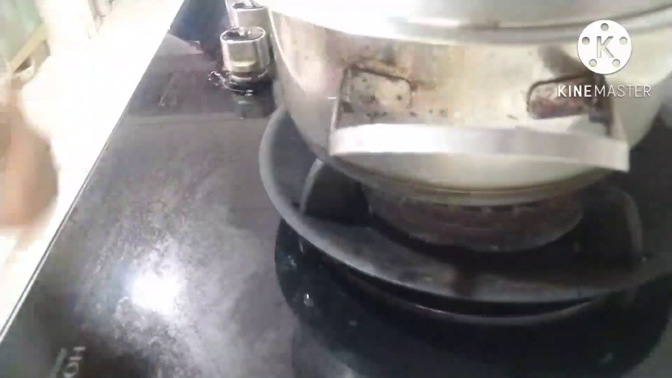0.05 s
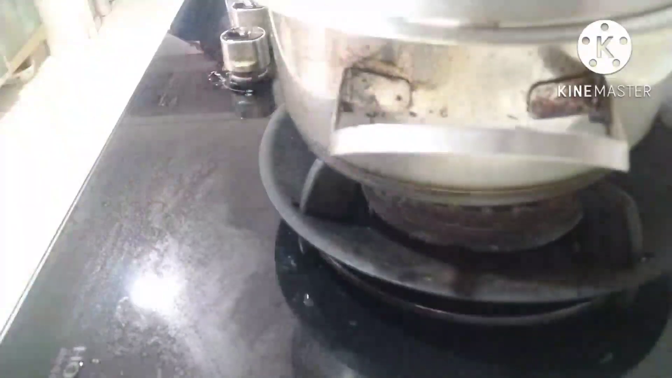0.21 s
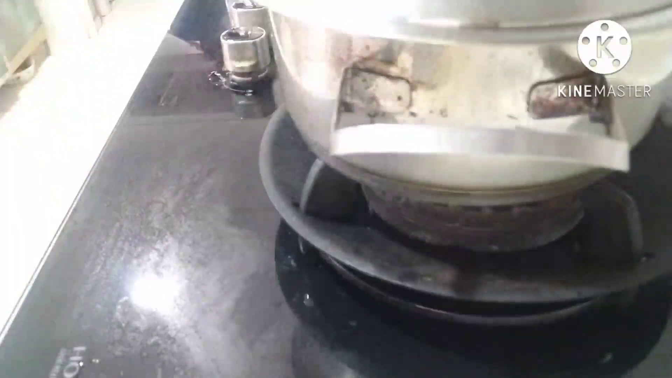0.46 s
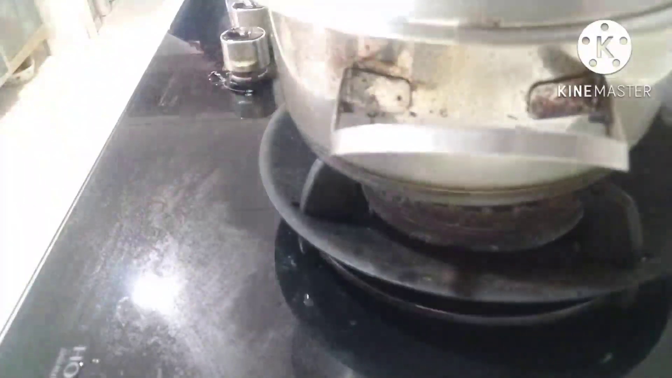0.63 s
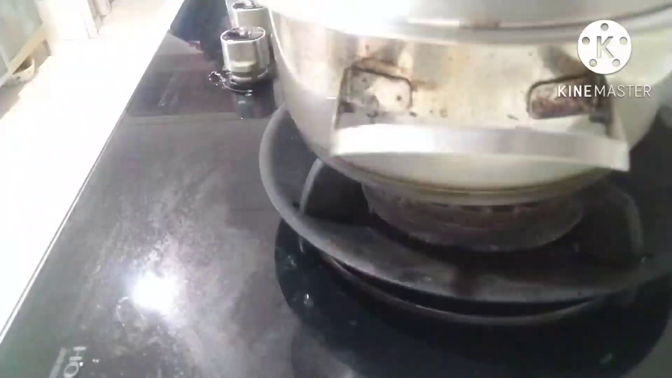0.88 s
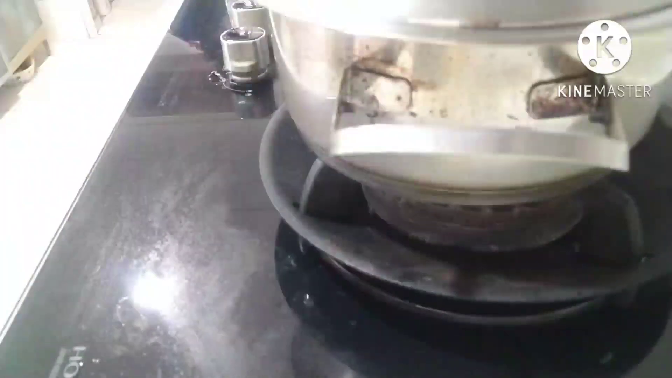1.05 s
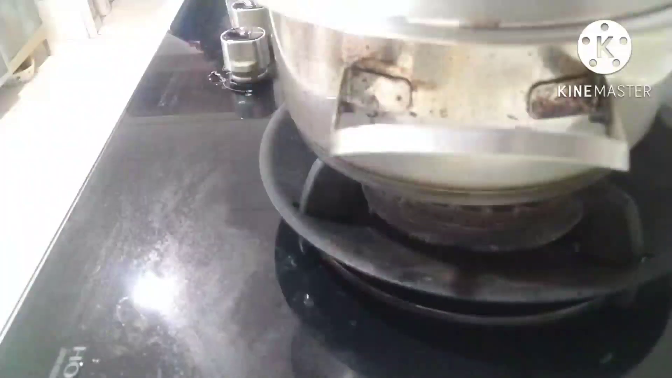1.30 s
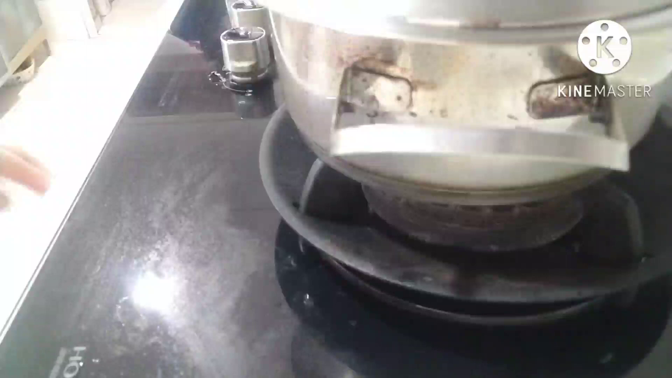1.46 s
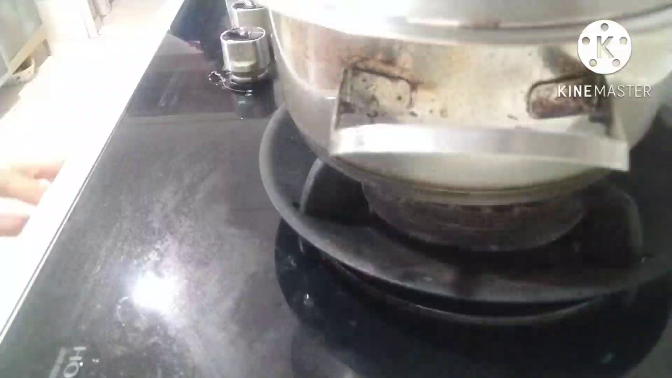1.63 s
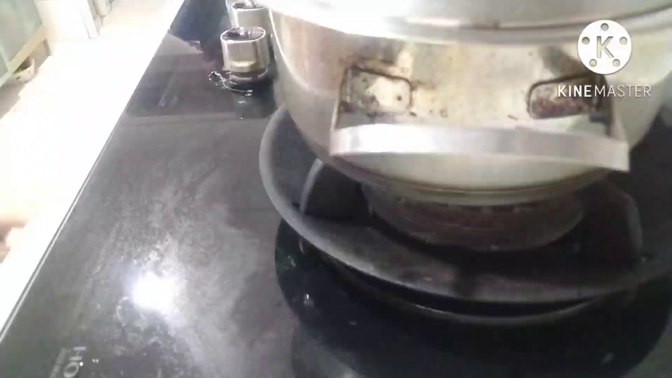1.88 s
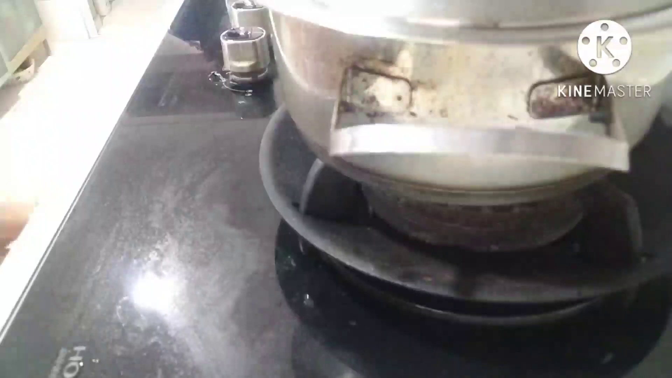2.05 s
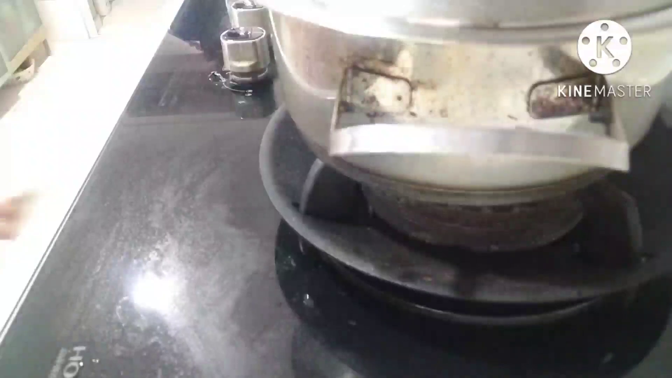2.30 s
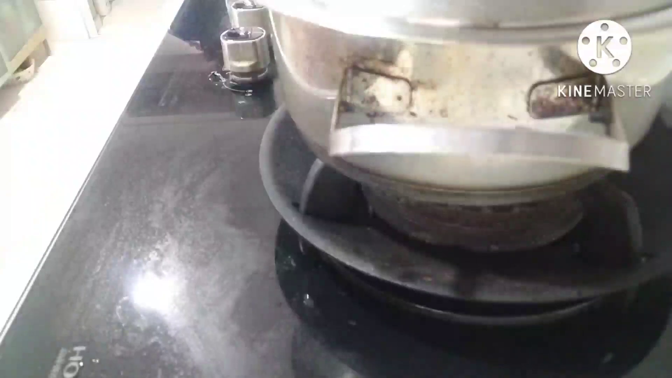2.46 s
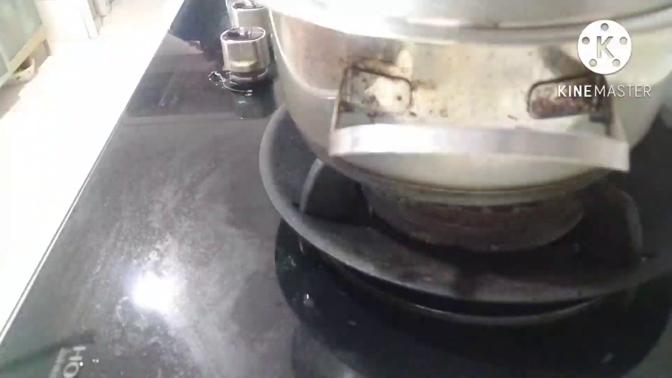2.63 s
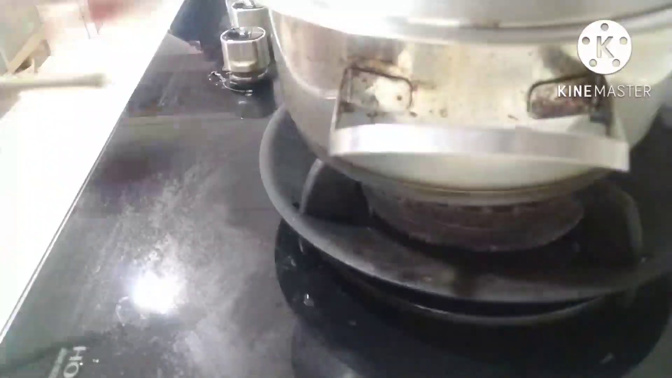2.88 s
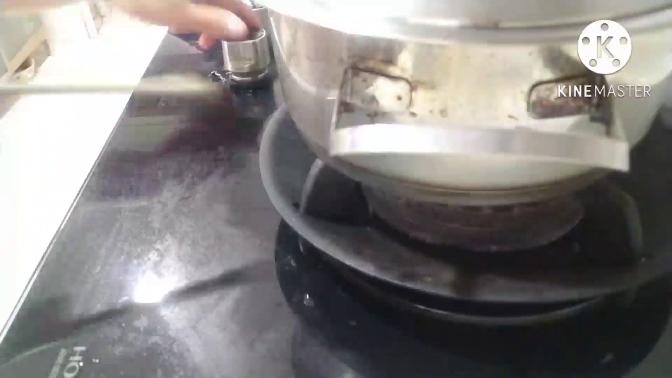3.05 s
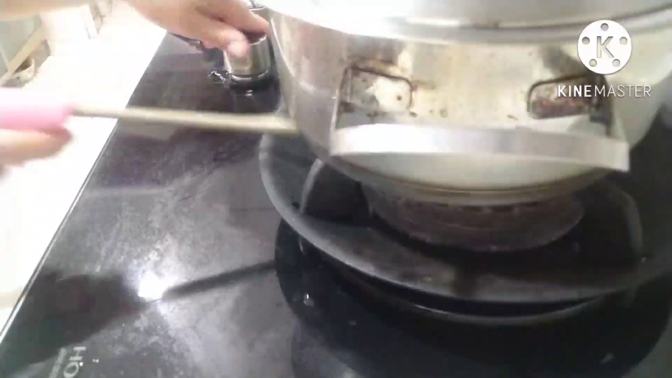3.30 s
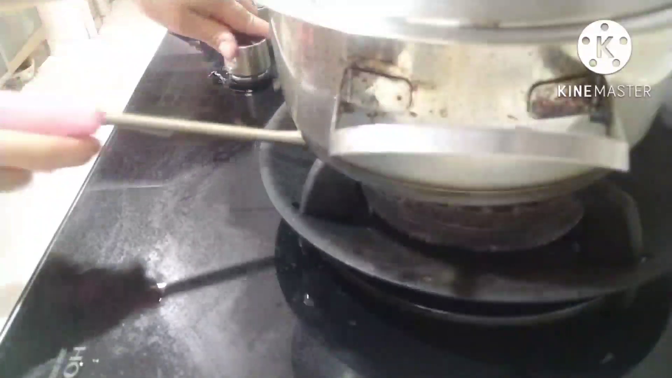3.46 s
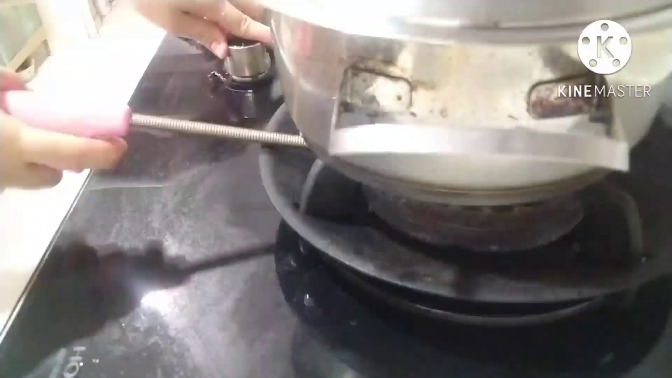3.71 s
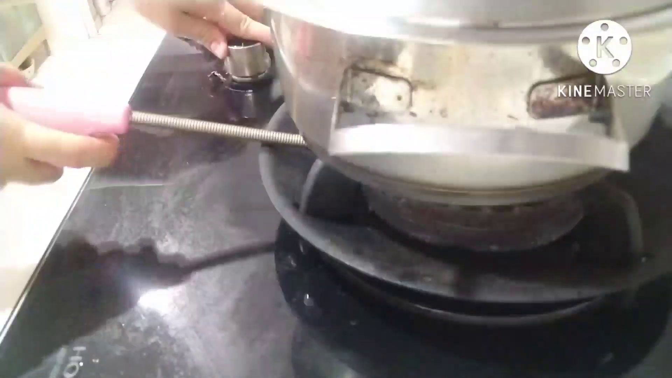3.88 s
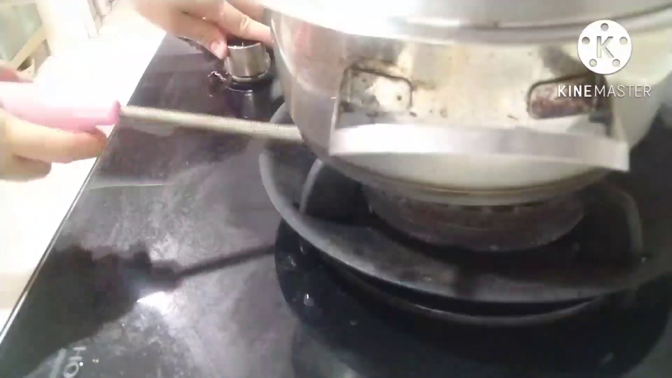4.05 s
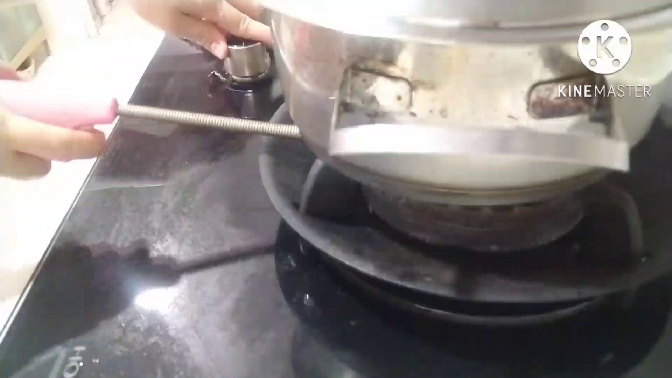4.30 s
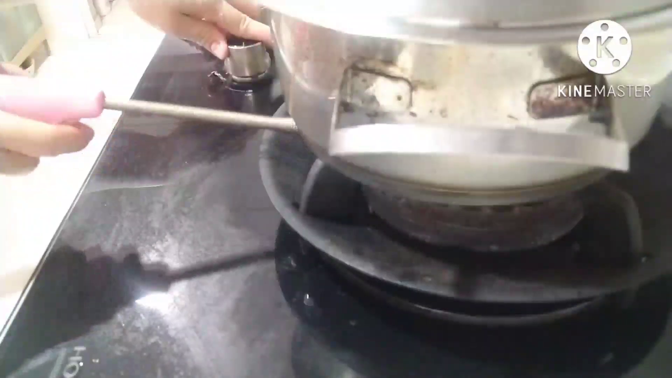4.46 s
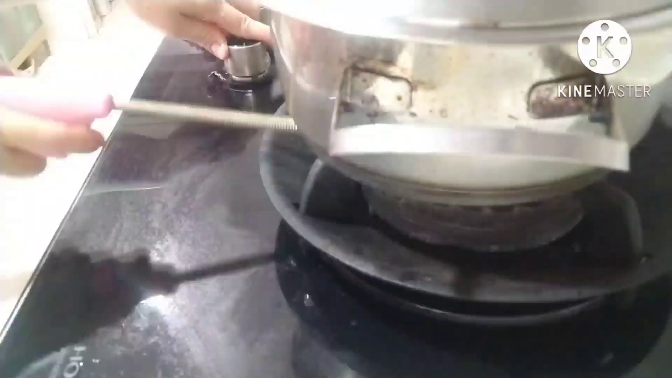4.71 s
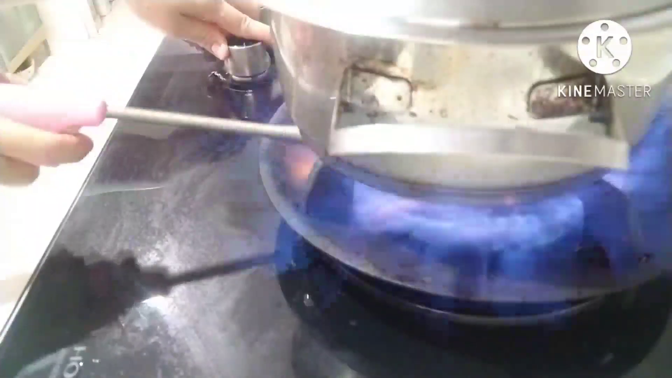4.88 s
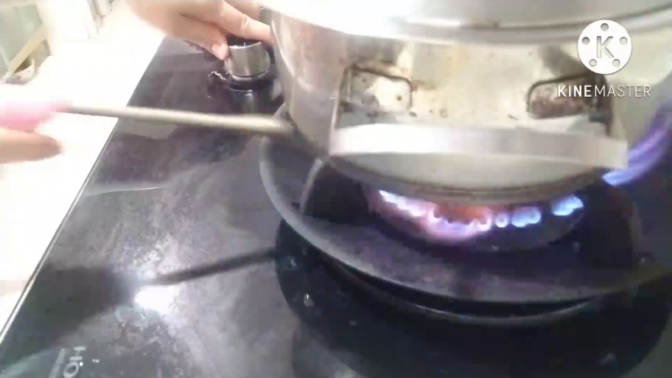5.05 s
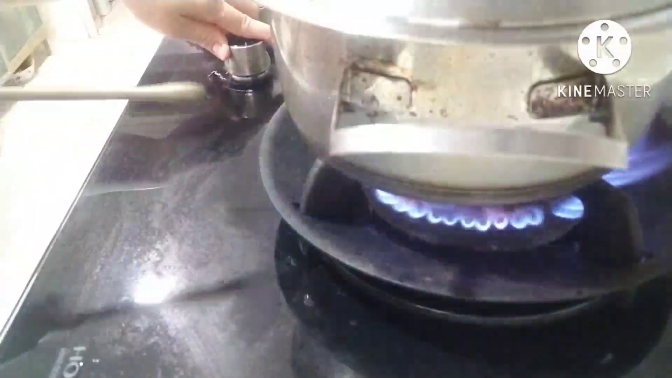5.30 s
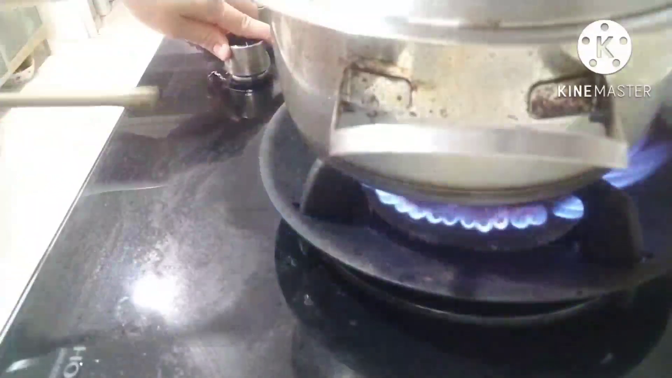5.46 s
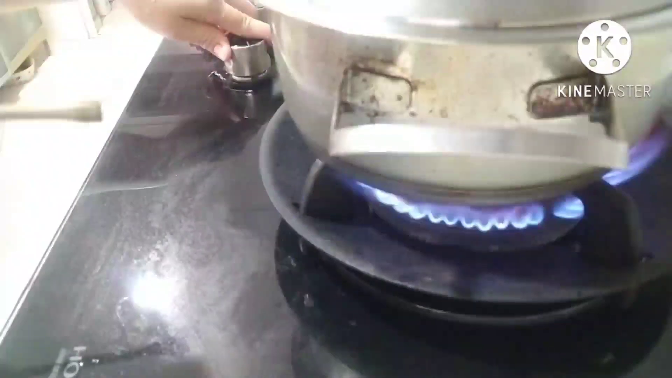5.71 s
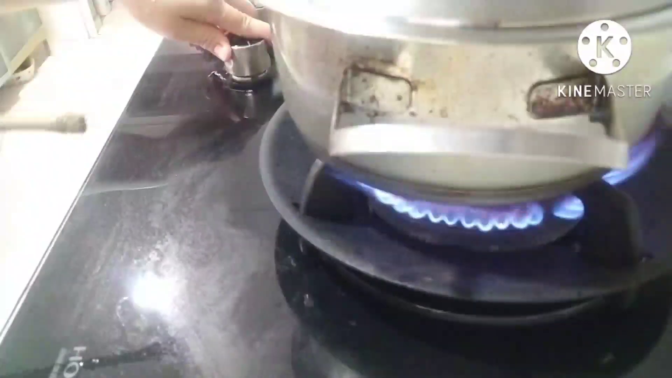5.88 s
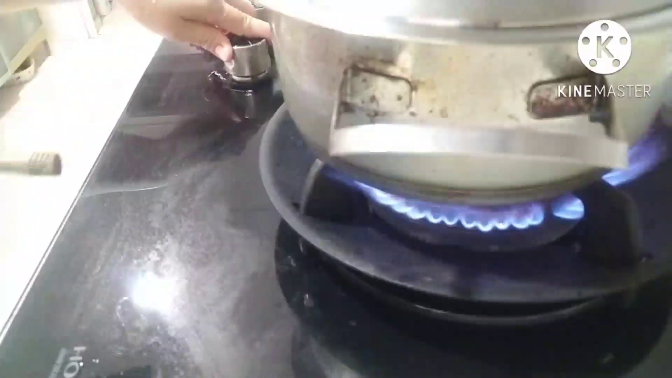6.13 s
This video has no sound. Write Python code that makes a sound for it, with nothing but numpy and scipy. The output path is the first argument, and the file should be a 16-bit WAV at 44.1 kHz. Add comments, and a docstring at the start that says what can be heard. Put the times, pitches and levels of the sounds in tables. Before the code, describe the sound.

A small, hard-walled kitchen heard close to the hob, with a very faint steady hush. Soft shuffling and nudges on the worktop begin at once. At 0.9-1.0 s a catch rattles and clunks firmly. Light plastic knocks and metal tinks follow at 1.5 s, a dull padded bump like a cupboard door at 1.9 s, more knocks around 2.0-2.1 s and 2.6 s. From 3.1 to 3.8 s a hand touches, presses and turns the knob, with small clacks and a brief grinding; faint gas starts rushing near 3.75 s. Sharp, bright piezo snaps crack at 3.9, 4.4 and 4.8 s, lightly ringing the steel pot, with thinner trigger clicks between. The second brings a small low puff; the third ignites a soft, lumpy whump that fades within half a second. A last thin click comes at 5.1 s, then a quiet, hollow, fluttering hiss swells slightly until 5.8 s and eases to the end.

```python
"""Lighting a gas hob

In a small, hard-walled kitchen, things clack and bump while a long-neck lighter is fetched: shaped pushes
ring resonances and echoes. The knob opens the gas, which is coloured noise, and three piezo snaps ring the
case, a steel pot and the room. The second spark puffs; the third takes with a soft noise whump, which gives
way to a quiet, hollow hiss of fluttering noise resonances."""
import sys
import numpy as np
from scipy import signal
from scipy.fft import rfft, irfft, next_fast_len
from scipy.io import wavfile
from scipy.ndimage import map_coordinates

SR = 44100
rng = np.random.default_rng(int(sys.argv[2]) if len(sys.argv) > 2 else 0)


def to_wav(s):
    """Save 16-bit WAV."""
    ch = np.atleast_2d(s).T  # columns
    pcm = np.round(np.clip(ch, -1, 1) * 32767)  # PCM
    wavfile.write(sys.argv[1], SR, pcm.astype(np.int16))


N = 270774
SIZE = 32768  # samples in one hit
HZ = np.fft.rfftfreq(SIZE, 1 / SR)
AGE = np.arange(SIZE) / SR  # seconds since a hit began
TIME = np.arange(N) / SR  # seconds since the scene began


def amp(db):
    """Decibels to gain."""
    return 10 ** (np.asarray(db) / 20)


def unit(x):
    """Scale to rms 1."""
    return x / np.sqrt(np.mean(x ** 2) + 1e-20)


def unit_hit(x):
    """Scale a hit to rms 1 over its first 30 ms and let its far end fade to silence."""
    fade = np.clip(2 - 2 * AGE / AGE[-1], 0, 1) ** 2
    onset = x[:int(0.03 * SR)]
    return fade * x / np.sqrt(np.mean(onset ** 2) + 1e-20)


def along(points, hz):
    """Read a curve of (Hz, value) points on a log frequency axis."""
    point_hz, value = np.transpose(points)
    return np.interp(np.log(hz + 1), np.log(point_hz + 1), value)


def wobble(rate):
    """A smooth random curve with this many knots a second."""
    return map_coordinates(rng.standard_normal(2048), [TIME * rate], mode="wrap")


def resonances(modes, hz):
    """Causal response of (Hz, width, dB) resonances, with alternating signs."""
    total = 0
    for k, (centre, width, db) in enumerate(modes):
        damping = 1j * hz * width
        total = total + (-1) ** k * amp(db) * damping / (centre * centre - hz * hz + damping)
    return total


def peaks(modes, hz, skirt):
    """Gain of (Hz, width, dB) resonances; a higher skirt darkens the valleys between them."""
    return sum(amp(db) / (1 + ((hz - centre) / width) ** 2) ** skirt for centre, width, db in modes)


def causal(gain):
    """The minimum-phase response with this gain, which rings only after the blow."""
    cepstrum = irfft(np.log(np.maximum(gain, 1e-6)))
    cepstrum[1:SIZE // 2] *= 2
    cepstrum[SIZE // 2 + 1:] = 0
    return np.exp(rfft(cepstrum))


def filtered(x, response):
    """Filter x by a response given as a function of frequency."""
    size = next_fast_len(N + SIZE)
    return irfft(rfft(x, size) * response(np.fft.rfftfreq(size, 1 / SR)), size)[:N]


def noise(points):
    """Noise of rms 1 with a (Hz, dB) colour."""
    return unit(filtered(rng.standard_normal(N), lambda hz: amp(along(points, hz))))


def fluttering(modes, skirt, flutter_db, rate):
    """Noise in (Hz, width, dB) resonances, each swelling and fading on its own."""
    total = 0
    for centre, width, db in modes:
        band = filtered(rng.standard_normal(N), lambda hz: peaks([(centre, width, 0)], hz, skirt))
        total = total + amp(db) * unit(band) * unit(amp(flutter_db * wobble(rate)))
    return total


def drifting(x, depth, rate):
    """Let the pitch of a steady sound wander by a relative depth."""
    return map_coordinates(x, [np.cumsum(1 + depth * wobble(rate))], mode="wrap")


def stroke(s, length, attack, t60):
    """Gain that rises from time s, holds until s + length and then dies away."""
    age = TIME - s
    return np.clip(age / attack, 0, 1) * amp(-60 * np.maximum(age - length, 0) / t60)


def strokes(rows, attack, t60):
    """Gain of (s, length, dB) movements that share one attack and release."""
    return sum(amp(db) * stroke(s, length, attack, t60) for s, length, db in rows)


def contact(t60, chatter_db):
    """Spectrum of one sharp push followed by brief, decaying chatter."""
    chatter = rng.standard_normal(SIZE) * amp(-60 * AGE / t60)
    return 1 + amp(chatter_db) * rfft(chatter / np.linalg.norm(chatter))


def walls(size_db, count=6):
    """Early echoes off the hob, pot and tiles comb the spectrum, differently for each blow."""
    delay, size = rng.uniform(0.001, 0.014, count), rng.standard_normal(count)
    echoes = np.bincount((delay * SR).astype(int), size / np.linalg.norm(size), SIZE)
    return 1 + amp(size_db) * rfft(echoes)


# The kitchen's echo. Each row: frequency in Hz, time to fall 60 dB in seconds.
KITCHEN_ECHO = [(100, .4), (350, .38), (1500, .4), (4500, .4), (8000, .36), (10500, .28), (14000, .26)]


def room():
    """Spectrum of a fresh kitchen echo of energy 1; the treble dies first."""
    hz, t, z = signal.stft(rng.standard_normal(SIZE), SR, nperseg=256)
    decay = amp(-60 * t / along(KITCHEN_ECHO, hz)[:, None])
    tail = signal.istft(z * decay, SR, nperseg=256)[1][:SIZE]
    tail = tail * (1 - np.exp(-AGE / 0.001))
    return rfft(tail / np.linalg.norm(tail))


def add(track, s, sound):
    """Mix a sound in at time s."""
    part = track[max(round(s * SR), 0):][:len(sound)]
    part += sound[:len(part)]


# Limits of the thump, knock, clack and tick ranges. Each entry: frequency in Hz.
BLOW_BAND_EDGES = [150, 520, 1450, 4000, 10000]


def clacks(blows, modes, skirt, chatter_db, room_db):
    """A hard thing is knocked; each blow rings its modes, balanced over four ranges from thump to tick."""
    out = np.zeros(N)
    body = causal(peaks(modes, HZ, skirt) / (1 + (HZ / 9200) ** 14))
    bands = []
    for edges in zip(BLOW_BAND_EDGES, BLOW_BAND_EDGES[1:]):
        sos = signal.butter(3, edges, "band", fs=SR, output="sos")
        bands.append(signal.sosfreqz(sos, HZ, fs=SR)[1])
    for s, *band_db, t60 in blows:
        blow = body * walls(size_db=-2.5) * (contact(t60, chatter_db) + amp(room_db) * room())
        swell = 1 - np.exp(-AGE / (0.025 * t60))  # a long, scuffing contact starts softly
        hit = sum(amp(db) * unit_hit(swell * irfft(blow * band)) for db, band in zip(band_db, bands))
        add(out, s, hit)
    return out


# The hush of the still kitchen. Each row: frequency in Hz, relative level in dB.
HUSH_COLOUR = [(25, -13), (90, -7.5), (230, -14), (350, -9), (780, -11.5), (1500, -15.5), (2300, -22),
               (5000, -29.5), (9000, -34.5), (15500, -34.5)]


def hush():
    """Faint, steady coloured noise lies under everything."""
    return amp(-75.5) * noise(HUSH_COLOUR)


# Dull colour of shuffling and of the worktop's ring. Each row: frequency in Hz, relative level in dB.
SHUFFLE_COLOUR = [(20, -45), (70, -21), (170, -23.5), (290, 12), (370, 8), (480, -10.5), (900, -21),
                  (2000, -49.5), (8000, -79)]
# Colour of a slide before its brightness tilt. Each row: frequency in Hz, relative level in dB.
SWISH_COLOUR = [(1500, -31), (3000, -15.5), (5000, -5.5), (7800, 3), (9000, -17.5), (12000, -32.5)]
# A hand rubs over the worktop. Each row: start in seconds, length in seconds, level in dB.
HAND_RUBS = [(0.30, 0.029, -57), (0.975, .04, -36), (1.66, 0.071, -65), (2.62, 0.55, -65.5),
             (3.10, .27, -56), (3.63, .09, -59)]
# Something smooth slides briefly.
# Each row: start in seconds, length in seconds, level in dB, brightness in dB per octave.
SMOOTH_SWIPES = [(0.172, 0.039, -66.5, -8), (0.282, 0.11, -68, 15), (1.62, 0.047, -61, -6.5),
                 (1.731, 0.029, -60, 1), (1.932, 0.1, -64.5, 1), (3.27, 0.012, -66.5, 18),
                 (3.735, 0.032, -67.5, 11)]
# Soft nudges of the worktop. Each row: start in seconds, level in dB.
WORKTOP_NUDGES = [(0.228, -60), (0.284, -57.5), (0.400, -57), (0.58, -65.5), (0.701, -64), (0.821, -53),
                  (1.142, -56.5), (1.65, -54.5), (2.714, -59.5), (2.92, -58.5), (3.356, -52.5),
                  (5.885, -61.5)]
RUB_ATTACK_S, RUB_T60_S = 0.016, 0.31
BUSY_UNTIL_S, BUSY_DB = 3.9, -77.5  # faint shuffling goes on until the lighter is in place
SWIPE_ATTACK_S, SWIPE_T60_S = 0.022, 0.33
SWIPE_TOP_HZ = 7800  # brightness tilts the colour up to here


def hands():
    """Uneven shuffling and sliding noise, with soft nudges that sound only the low ring of the worktop."""
    busy = amp(BUSY_DB) * stroke(0, BUSY_UNTIL_S, RUB_ATTACK_S, RUB_T60_S)
    effort = strokes(HAND_RUBS, RUB_ATTACK_S, RUB_T60_S) + busy
    out = effort * noise(SHUFFLE_COLOUR) * unit(amp(4 * wobble(35)))
    for s, length, db, brightness in SMOOTH_SWIPES:
        colour = [(hz, band_db + brightness * np.log2(min(hz, SWIPE_TOP_HZ))) for hz, band_db in SWISH_COLOUR]
        swish = signal.fftconvolve(noise(colour), irfft(walls(size_db=-2)))[:N]
        unevenness = unit(amp(1.5 * wobble(45)))
        out += amp(db) * stroke(s, length, SWIPE_ATTACK_S, SWIPE_T60_S) * unit(swish) * unevenness
    worktop = causal(amp(along(SHUFFLE_COLOUR, HZ)))
    for s, db in WORKTOP_NUDGES:
        nudge = worktop * (contact(t60=0.13, chatter_db=2) + amp(-4.5) * room())
        add(out, s, amp(db) * unit_hit(irfft(nudge)))
    return out


# A catch rattles, then clunks. Each row: start in seconds, thump level in dB, knock level in dB,
# clack level in dB, tick level in dB, chatter's time to fall 60 dB in seconds.
CATCH_BLOWS = [(0.026, -83, -65, -67.5, -74, 0.27), (0.885, -54.5, -75, -63, -55.5, 0.58),
               (0.9155, -52.5, -60.5, -44, -45.5, 0.07), (0.946, -43, -52, -40.5, -46.5, 0.11),
               (0.975, -37, -36, -38, -44, 0.02), (0.986, -39, -43, -45.5, -54, 0.27)]
# The catch's ring. Each row: frequency in Hz, width in Hz, relative level in dB.
CATCH_RING = [(347, 31, 15.5), (513, 240, -0.5), (764, 99, 4.5), (960, 56, 4), (1767, 33, 7), (1874, 99, 3),
              (2140, 96, -3), (2560, 136, 4), (3580, 240, -22.5), (4180, 67, -36), (5240, 260, -31),
              (6020, 120, -32), (7270, 480, -35)]


def catch():
    """The catch's blows chatter strongly, with little of the room."""
    return clacks(CATCH_BLOWS, CATCH_RING, skirt=1.0, chatter_db=12.0, room_db=-10)


# Light touches on thin metal.
# Each row: start in seconds, pitch in Hz, level in dB, time to fall 60 dB in seconds.
METAL_TINKS = [(0.039, 1060, -59, 0.15), (1.350, 2370, -65, 0.056), (1.472, 2560, -61, 0.05),
               (1.509, 2470, -53, 0.26), (1.546, 1108, -56, 0.18), (2.126, 1115, -55, 0.098),
               (2.127, 2410, -52, 0.076), (2.553, 2350, -57.5, 0.18), (3.43, 4387, -71.5, 0.23),
               (5.112, 3440, -61.5, 0.32)]


def tinks():
    """One main note of thin metal with weak partials around it, blurred by the room."""
    out = np.zeros(N)
    partials = [(1, 3.5), (0.63, -12.5), (1.37, -12), (1.8, -18)]  # (frequency ratio, dB)
    for s, hz, db, t60 in METAL_TINKS:
        note = sum(amp(part_db) * np.sin(2 * np.pi * hz * ratio * AGE) for ratio, part_db in partials)
        note = note * amp(-60 * AGE / t60) * (1 - np.exp(-AGE / 0.0011))
        blurred = irfft(rfft(note) * (1 + amp(-8.5) * room()))
        add(out, s, amp(db) * unit_hit(blurred))
    return out


# The lighter's body knocks as it is picked up and regripped, and as its trigger reaches its end stop.
# Each row: start in seconds, thump level in dB, knock level in dB, clack level in dB, tick level in dB,
# chatter's time to fall 60 dB in seconds.
BODY_BLOWS = [(1.509, -66.5, -84, -56, -84, 0.037), (1.543, -51.5, -51, -36, -40, .015),
              (2.015, -58, -45.5, -47.5, -49, 0.023), (2.041, -39, -49, -48.5, -54, 0.1),
              (2.080, -67, -60.5, -50, -49, .015), (2.126, -60, -66, -43.5, -44.5, .012),
              (2.550, -74, -63, -50.5, -57.5, 0.016), (2.655, -82, -56.5, -46.5, -49, 0.021),
              (4.2715, -68, -52.5, -65, -68, .03), (4.7216, -66, -50.5, -59, -66.5, .03)]
# The body's ring. Each row: frequency in Hz, width in Hz, relative level in dB.
BODY_RING = [(296, 16, -3), (331, 15, 5), (720, 83, -31), (1095, 24, 10.5), (1440, 39, -6), (1744, 36, 3.5),
             (2502, 220, 16.5), (2955, 70, -7), (3163, 100, -22), (3580, 46, -12), (4000, 110, -16.5),
             (4570, 100, -16), (5400, 59, -22), (6130, 320, -14), (7220, 160, -9), (7870, 140, -15)]


def lighter_body():
    """Knocks on the lighter's body ring its resonances, with the room well in the blend."""
    return clacks(BODY_BLOWS, BODY_RING, skirt=0.8, chatter_db=9.5, room_db=1.5)


# A dull bump, like a cupboard door closing. Each row: frequency in Hz, relative level in dB.
DOOR_COLOUR = [(59, -41.5), (100, -23), (159, 0), (212, -36), (270, -11), (355, -4.5), (394, -6.5),
               (500, -1), (615, -2), (896, 2), (1120, -4), (1780, -4.5), (6000, -48.5), (7800, -76),
               (13200, -120)]
# The door panel's two close modes. Each row: frequency in Hz, starting level in dB.
PANEL_MODES = [(80, -55.5), (86, -46)]
PANEL_ATTACK_S, PANEL_FREE_S, PANEL_T60_S, PANEL_STOP_T60_S = 0.043, 0.418, 1.73, 0.068


def door():
    """A padded bump; the panel's two close modes beat until it comes to rest."""
    out, s = np.zeros(N), 1.862
    push = contact(t60=0.29, chatter_db=15.0) + amp(10.5) * room()
    blow = causal(amp(along(DOOR_COLOUR, HZ))) * walls(size_db=-2) * push
    add(out, s, amp(-34.5) * unit_hit(irfft(blow)))
    age = np.maximum(TIME - s, 0)
    panel = 0
    for hz, db in PANEL_MODES:
        wander = 1.44 * wobble(30.04)  # phase in radians
        panel = panel + amp(db) * np.sin(2 * np.pi * hz * age + wander)
    held = stroke(s, PANEL_FREE_S, PANEL_ATTACK_S, PANEL_STOP_T60_S)
    return out + panel * amp(-60 * age / PANEL_T60_S) * held


# A hand meets the knob, presses it in and turns it. Each row: start in seconds, thump level in dB,
# knock level in dB, clack level in dB, tick level in dB, chatter's time to fall 60 dB in seconds.
KNOB_BLOWS = [(3.134, -61, -60, -53.5, -51, 0.021), (3.141, -64, -44.5, -46.5, -54.5, 0.16),
              (3.247, -47.5, -56, -54, -76, 0.022), (3.282, -41, -69, -75, -90, 0.07),
              (3.429, -54, -63, -76, -62.5, 0.033), (3.693, -49, -53.5, -53, -57, 0.028),
              (3.755, -58.5, -58.5, -66.5, -72, 0.02), (3.840, -61.5, -57, -79.5, -61, 0.022)]
# The knob's ring. Each row: frequency in Hz, width in Hz, relative level in dB.
KNOB_RING = [(311.7, 18, 10.5), (522.6, 46, -11), (780, 79, 0), (900, 43, -20.5), (1150, 50, -8.5),
             (1278, 76, -3.5), (2235, 77, -5.5), (2760, 69, -17.5), (3477, 64, -27), (4180, 97, -30),
             (5653, 350, -23.5), (7350, 81, -17.5), (7830, 88, -28)]


def knob():
    """Touches on the knob ring its resonances, with plenty of chatter and room."""
    return clacks(KNOB_BLOWS, KNOB_RING, skirt=0.84, chatter_db=13.5, room_db=8.5)


# The valve's ring. Each row: frequency in Hz, width in Hz, relative level in dB.
GRIND_RING = [(680, 32, -4), (843, 71, -4), (1120, 33, -3.5), (1104, 28, 2), (1770, 46, -18.5),
              (2190, 50, -17)]
# Twists of the knob. Each row: start in seconds, length in seconds, level in dB.
KNOB_TWISTS = [(3.408, .07, -60.5), (3.615, .10, -57.5), (3.776, 0.04, -47.5)]
TWIST_ATTACK_S, TWIST_T60_S = 0.0044, 0.36


def valve():
    """The valve grinds with each twist: uneven noise sounds its resonances."""
    grind = unit(filtered(rng.standard_normal(N), lambda hz: peaks(GRIND_RING, hz, skirt=1.3)))
    return strokes(KNOB_TWISTS, TWIST_ATTACK_S, TWIST_T60_S) * grind * unit(amp(1.2 * wobble(60)))


# Colour of the unlit jet. Each row: frequency in Hz, relative level in dB.
JET_COLOUR = [(240, -42), (400, -2.5), (554, -17), (691, -6.5), (970, -9.5), (1100, 4), (1470, -29),
              (2230, -27.5), (4230, -46.5), (7700, -23.5), (9000, -38), (11700, -74.5), (19800, -120)]
# The burner's hollow. Each row: frequency in Hz, width in Hz, relative level in dB.
HOLLOW_MODES = [(1320, 85, 7), (1450, 60, -1.5), (1587, 50, -3), (1810, 69, -8)]
# The faintly whistling ports. Each row: frequency in Hz, width in Hz, relative level in dB.
PORT_MODES = [(284, 16, -3.5), (701, 110, -6.5), (2940, 49, -19.5), (3400, 36, -30.5), (4230, 60, -28.5),
              (5110, 70, -28.5), (5550, 45, -20.5), (7200, 48.8, -29), (8100, 79, -17)]
GAS_ON_S, GAS_RISE_S, GAS_DB = 3.75, 0.25, -62  # unlit gas builds up and flows until the last spark
# the lit burner draws harder after a moment, then settles
FLAME_LOW_DB, FLAME_FULL_DB, FLAME_SWELL_S = -70.5, -57, (5.43, 5.77)
FLAME_SETTLE_DB_PER_S = 10
HOLLOW_DRIFT, HOLLOW_FLUTTER_DB = 0.02, 4.5  # relative pitch wander; flutter of each resonance
PORTS_DB = -76  # gain on the blend of port modes


def burner():
    """Raw gas rushes out until it catches, then burns with a hollow, fluttering hiss."""
    lit_s = SPARK_SNAPS[-1][0]
    jet = drifting(noise(JET_COLOUR), depth=0.07, rate=11) * unit(amp(3.4 * wobble(30)))
    gas = amp(GAS_DB) * stroke(GAS_ON_S, lit_s - GAS_ON_S, GAS_RISE_S, t60=0.1) * jet
    alight = np.clip((TIME - lit_s) / WHUMP_PEAK_S, 0, 1)
    # the jet sounds the burner's hollow, whose resonances slide together with the flow
    hollow = unit(fluttering(HOLLOW_MODES, skirt=1.7, flutter_db=HOLLOW_FLUTTER_DB, rate=13))
    hollow = drifting(hollow, HOLLOW_DRIFT, rate=9)
    draw_db = np.interp(TIME, FLAME_SWELL_S, [FLAME_LOW_DB, FLAME_FULL_DB])
    draw_db = draw_db - FLAME_SETTLE_DB_PER_S * np.maximum(TIME - FLAME_SWELL_S[-1], 0)
    # each port flutters on its own and whistles faintly
    ports = fluttering(PORT_MODES, skirt=3.9, flutter_db=4.5, rate=11)
    return gas + alight * (amp(draw_db) * hollow + amp(PORTS_DB) * ports)


# The piezo hammer strikes. Each row: start in seconds, base level of the layers in dB.
SPARK_SNAPS = [(3.9379, -27), (4.3945, -28.5), (4.843, -30)]
# The trigger springs back with a thin click; fainter clicks follow.
# Each row: start in seconds, level of the click in dB.
TRIGGER_RETURNS = [(4.1877, -36.5), (4.2715, -49.5), (4.3216, -56), (4.6295, -39.5), (4.6682, -56),
                   (4.7216, -52.5), (4.7714, -61.5), (5.1103, -37.5)]
# The lighter's plastic case. Each row: frequency in Hz, width in Hz, relative level in dB.
CASE_MODES = [(1550, 150, 3.5), (3700, 150, 4), (4770, 330, 1), (7000, 1300, -3), (8740, 300, -15),
              (10700, 400, -16.5)]
# The snap as it spreads into the room. Each row: frequency in Hz, relative level in dB.
SPREAD_COLOUR = [(25, -43), (85, -24.5), (156, -10), (233, -18.5), (480, -4.5), (650, -7), (1100, -7.5),
                 (1620, 2), (2420, -6), (3200, -0.5), (4500, -4.5), (7400, -5), (9200, -17), (12300, -31),
                 (15300, -26)]
# The trigger's thin click. Each row: frequency in Hz, relative level in dB.
CLICK_COLOUR = [(150, -54.5), (250, -17.5), (795, -29), (1200, -2.5), (1890, -6.5), (2160, -6.5),
                (2530, -12), (3010, -0.5), (3960, -10), (4960, -5), (7770, -9.5), (10600, -32.5),
                (15500, -43)]
# The steel pot, set ringing by each snap. Each row: frequency in Hz, width in Hz, relative level in dB.
POT_MODES = [(1030, 20, 5.5), (1457, 9.8, -3), (1550, 4, 7), (1815, 18, 10), (2020, 5.3, -4), (3130, 32, 0),
             (3460, 36, 1), (3637, 36, -5.5), (4360, 8.2, -1), (6210, 35, -7), (6930, 37, -4.5),
             (6650, 73, 2)]


def lighter():
    """Each hammer blow cracks and rings the pot and the room; thinner clicks follow the trigger back."""
    out = np.zeros(N)
    case = resonances(CASE_MODES, HZ) * causal(1 / (1 + (HZ / 10500) ** 5))
    pot = resonances(POT_MODES, HZ)
    spread = causal(amp(along(SPREAD_COLOUR, HZ)))
    thin = causal(amp(along(CLICK_COLOUR, HZ)))
    for s, db in SPARK_SNAPS:
        crack = unit_hit(irfft(case * contact(t60=0.019, chatter_db=0)))
        echo = unit_hit(irfft(spread * room() * walls(size_db=-14.0)))
        ring = unit_hit(irfft(pot * contact(t60=0.014, chatter_db=-5.5)))
        add(out, s, amp(db) * (amp(1.0) * crack + amp(-2.5) * echo + amp(-11.0) * ring))
        add(out, s + 0.0065, amp(db - 17.0) * crack)  # the nearest wall throws the crack back
        # the hammer slips off its latch just before it lands
        slip = unit_hit(irfft(thin * contact(t60=0.03, chatter_db=12)))
        add(out, s - 0.003, amp(db - 21) * slip)
    for s, db in TRIGGER_RETURNS:
        push = contact(t60=0.023, chatter_db=5) + amp(0.5) * room()
        click = unit_hit(irfft(thin * walls(size_db=-10.0) * push))
        ring = unit_hit(irfft(pot * contact(t60=0.02, chatter_db=-3.5)))
        add(out, s, amp(db) * (click + amp(-15.0) * ring))
    return out


# Colour of the small puff. Each row: frequency in Hz, relative level in dB.
SMALL_PUFF_COLOUR = [(20, -34.5), (45, -17.5), (85, -5), (150, -3.5), (280, 6.5), (600, -23), (2000, -47.5),
                     (6000, -83.5)]
# Colour of the whump. Each row: frequency in Hz, relative level in dB.
ROAR_COLOUR = [(25, -19.5), (70, -20.5), (150, 4.5), (210, -9.5), (300, 6), (450, -4.5), (600, -3.5),
               (900, -8.5), (1300, -19.5), (2500, -22.5), (6000, -57.5)]
PUFF_DB, PUFF_ATTACK_S, PUFF_T60_S = -41.5, 0.008, 0.13  # the whump shares this attack
# the flame front grows round the ring, flares and dies away, the treble very slightly faster
WHUMP_DB, WHUMP_GROW_DB_PER_S, WHUMP_PEAK_S, WHUMP_LENGTH_S = -33.5, 230, 0.071, 0.1
WHUMP_SPLIT_HZ, WHUMP_LOW_T60_S, WHUMP_HIGH_T60_S = 380, 0.39, 0.38


def ignition():
    """The second spark gives a small puff; the third sets all the gas off in one lumpy whump."""
    (puff_s, _), (lit_s, _) = SPARK_SNAPS[-2:]
    puff_gain = amp(PUFF_DB) * stroke(puff_s, PUFF_ATTACK_S, PUFF_ATTACK_S, PUFF_T60_S)
    puff = puff_gain * noise(SMALL_PUFF_COLOUR)
    roar = noise(ROAR_COLOUR) * unit(amp(2.1 * wobble(90)))
    low = filtered(roar, lambda hz: 1 / (1 + (hz / WHUMP_SPLIT_HZ) ** 6))
    high = roar - low
    growth = amp(WHUMP_DB + WHUMP_GROW_DB_PER_S * np.minimum(TIME - lit_s - WHUMP_PEAK_S, 0))
    low_gain = stroke(lit_s, WHUMP_LENGTH_S, PUFF_ATTACK_S, WHUMP_LOW_T60_S)
    high_gain = stroke(lit_s, WHUMP_LENGTH_S, PUFF_ATTACK_S, WHUMP_HIGH_T60_S)
    return puff + growth * (low * low_gain + high * high_gain)


def scene():
    """Everything at the hob over the faint hush of the kitchen."""
    handling = catch() + lighter_body() + knob()
    gas = valve() + burner() + ignition()
    return (hush() + hands() + handling + tinks() + door() + gas + lighter())[None]


def record(dry):
    """The microphone rounds off the sharpest peaks, thins the deep bass and cuts steeply above its top."""
    ceiling, bass_hz, top_hz = 0.5, 32, 15750
    rounded = dry[0] / (1 + np.abs(dry[0] / ceiling) ** 6) ** (1 / 6)
    thinned = signal.sosfilt(signal.butter(2, bass_hz, "high", fs=SR, output="sos"), rounded)
    return filtered(thinned, lambda hz: 1 / (1 + (hz / top_hz) ** 160))[None]


dry = scene()
out = record(dry)
to_wav(out)
```